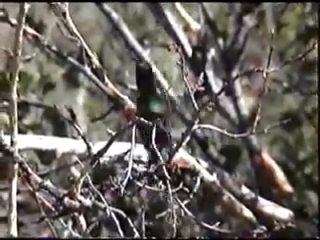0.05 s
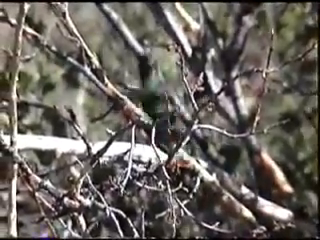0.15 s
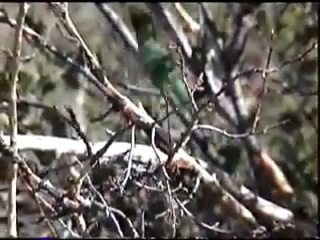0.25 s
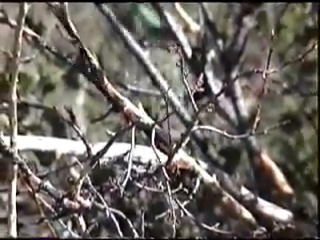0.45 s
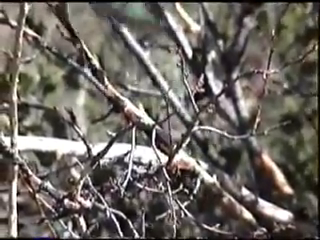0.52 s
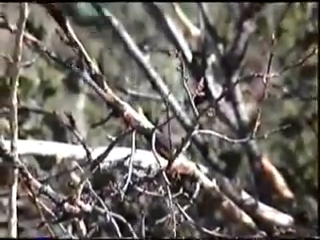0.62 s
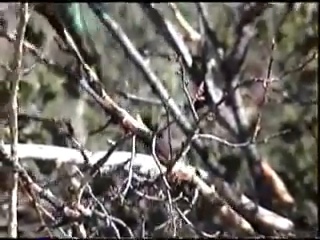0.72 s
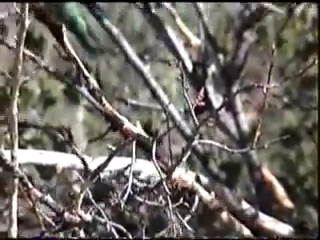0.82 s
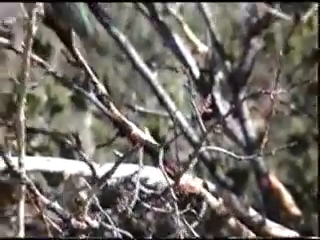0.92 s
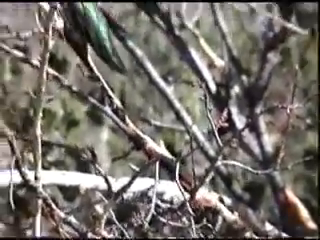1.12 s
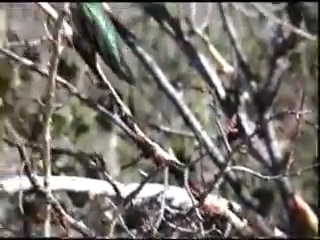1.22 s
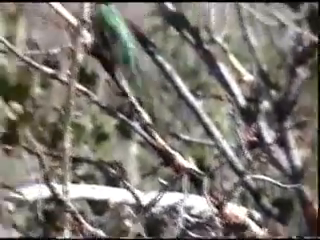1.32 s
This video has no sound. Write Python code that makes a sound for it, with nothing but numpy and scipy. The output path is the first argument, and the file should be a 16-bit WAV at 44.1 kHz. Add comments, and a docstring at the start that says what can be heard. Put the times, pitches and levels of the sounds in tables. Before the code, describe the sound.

A hummingbird takes off close to the microphone, its wings making a rapid, buzzy, whistling trill. The trill swells quickly, then fades as the bird moves away, over faint steady outdoor hiss.

```python
"""Hummingbird taking off

A hummingbird lifts off a nearby twig and hovers away. On each downstroke the slotted tip feathers of
both wings whistle, slightly out of tune, with a puff of air; the flip before it whistles more faintly.
Ground and shrubs scatter the trill. Behind it: far birds, a soft rush, outdoor hiss, a camera motor."""
import sys
import numpy as np
from scipy import signal
from scipy.fft import rfft, irfft
from scipy.io import wavfile

SR = 44100
rng = np.random.default_rng(int(sys.argv[2]) if len(sys.argv) > 2 else 0)


def unload_wav(signal):
    """Save mono or channel-first audio to the path in sys.argv[1] as 16-bit WAV at rate SR, clipped to [-1, 1]."""
    wavfile.write(
        sys.argv[1],
        SR,
        np.round(np.clip(np.atleast_2d(signal).T, -1, 1) * 32767).astype(np.int16),
    )


N = 59535
TIME_S = np.arange(N) / SR
TAKEOFF_S = .13

# flight path as heard (time [s], level [dB], feather pitch [Hz])
FLIGHT = [(.139, -47.5, 1950), (.163, -31.5, 1965), (.185, -38.5, 1980), (.206, -26.5, 1983),
          (.272, -17, 1986), (.415, -16, 1970), (.438, -19, 1954), (.463, -17.5, 1953), (.61, -21, 1967),
          (.683, -26, 1965), (.71, -24, 1907), (.812, -27, 1952), (.835, -31, 1910), (.882, -30, 1939),
          (1.006, -33.5, 1953), (1.056, -30, 1959), (1.08, -38.5, 1900), (1.3, -38, 1886)]


def feather_whistle(hz, flutter, sag_per_s=2.69, flutter_depth=.014, swell_s=.0037, release_s=.0026):
    """One sweep of a fluttering tip feather: a short swelling tone that sags in pitch."""
    # feather partials (pitch multiple, level [dB])
    partials = [(1, -22.5), (2, -63), (3, -1.5), (4, -42), (5, -20.5), (6, -44)]
    t = (np.arange(len(flutter)) - len(flutter) // 2) / SR
    turns = np.cumsum(hz * (1 - sag_per_s * t + flutter_depth * flutter)) / SR + rng.random()
    tone = sum(amp(db) * np.sin(2 * np.pi * k * turns) for k, db in partials)
    return tone * np.exp(-abs(t / np.where(t < 0, swell_s, release_s)) ** 4.5)


def wing_trill(size=1024, pitch_scatter=.0043, wing_detune=.0259, scatter_db=.94, wing_lag_s=.0015):
    """Both wings whistle as they flip over, then louder on the way down; a ground bounce follows."""
    # flip at the top of the stroke (time [s], level re downstroke [dB])
    flip_level = [(.25, -26), (.42, -25.5), (.7, -10.5), (.88, -2), (1.05, -4.5), (1.3, -1.5)]
    out, flutter = np.zeros(N), drift(620)
    for s in downstrokes():
        db, hz = curve(FLIGHT, s) + 2, curve(FLIGHT, s, column=2)
        # (delay [s], level [dB], pitch ratio), also for the wings below
        stroke = (0, 0, 1)
        bounce = (.0055, -11.5, 1)
        flip = (-.0065, curve(flip_level, s), 1.02)
        for delay_s, part_db, pitch in (stroke, bounce, flip):
            force, tune, lag = rng.standard_normal(3)
            loud_wing = (0, 0, 1 + pitch_scatter * tune)
            soft_wing = (wing_lag_s * lag, -5.5, 1 + wing_detune * rng.choice([-1, 1]))
            for lag_s, wing_db, wing_pitch in (loud_wing, soft_wing):
                tone = feather_whistle(hz * pitch * wing_pitch, flutter[rng.integers(N - size):][:size])
                gain = amp(db + part_db + wing_db + scatter_db * force)
                add(out, s + delay_s + lag_s - size / 2 / SR, gain * tone)
    return out


def beat_turns():
    """Wingbeats completed, per sample."""
    # wingbeat (time [s], rate [Hz])
    wingbeat = [(0.14, 43.1), (0.22, 46.74), (0.37, 40.73), (0.65, 41.14), (0.77, 38.31), (0.87, 43.05),
                (0.96, 39.37), (1.17, 41.28), (1.27, 37.54)]
    return np.cumsum(curve(wingbeat, TIME_S)) / SR


def downstrokes():
    """Times [s] of fastest downward sweep."""
    times = np.flatnonzero(np.diff(np.floor(beat_turns()))) / SR
    return times[times > TAKEOFF_S]


def wing_air(puff_s=.0042, puff_db=-16.5, lift_db=7.5, lift_s=.1):
    """A puff of turbulence per downstroke over the wings' low hum; the first strokes tear more air."""
    # torn air (frequency [Hz], density [dB])
    puff_spectrum = [(30, -2.5), (170, 2), (400, -3.5), (900, -4.5), (1500, -2), (1800, 12), (2150, 11.5),
                     (2700, -7.5), (4200, -6), (5900, -5.5), (7500, -3.5), (9000, -7), (12000, -3)]
    # hum (wingbeat multiple, level [dB])
    hum_partials = [(1, -42.5), (2, -49), (3, -44.5), (4, -44.5), (5, -79), (6, -42.5)]
    t, turns = TIME_S, beat_turns()
    puffs = sum(amp(rng.standard_normal()) * np.exp(-((t - s) / puff_s) ** 2) for s in downstrokes())
    lift = np.exp(-np.maximum(t - TAKEOFF_S, 0) / lift_s)
    turbulence = amp(puff_db + lift_db * lift) * puffs * noise(puff_spectrum)
    hum = sum(amp(db) * np.sin(2 * np.pi * k * turns) for k, db in hum_partials) * (t > TAKEOFF_S)
    return amp(curve(FLIGHT, t)) * (turbulence + hum)


def downwash():
    """Soft low thumps of air from the closest strokes."""
    # gusts (time [s], half-width [s], level [dB])
    gusts = [(0.22, 0.0099, -52), (0.268, 0.014, -55), (.319, 0.0067, -44), (0.47, 0.013, -60)]
    # (frequency [Hz], density [dB])
    gust_spectrum = [(25, -11), (160, -3), (400, -2), (800, -4), (2000, -13), (5000, -24)]
    envelope = sum(amp(db) * np.exp(-((TIME_S - s) / width_s) ** 2) for s, width_s, db in gusts)
    return envelope * noise(gust_spectrum)


def shrub_scatter(bird, places=8, late_db=-6):
    """Reflections that change as the bird moves and gain on the direct sound as it leaves."""
    # ground and shrub scatter (time [s], level re direct [dB])
    scatter = [(.2, -19.5), (.33, -12), (.45, -16.5), (.7, -6), (.9, -3), (1.3, -12.5)]
    sent = bird * amp(curve(scatter, TIME_S))
    place = np.linspace(0, places - 1, N)
    crossfades = (np.cos(np.pi / 2 * np.clip(place - k, -1, 1)) for k in range(places))
    early = sum(echoes(sent * fade, t60_s=.04) for fade in crossfades)
    return early + amp(late_db) * echoes(sent, t60_s=.22)


def stereo(mid, side_phase_rad=1.0):
    """Places the bird nearly ahead, a little left in the midrange, widest as it passes closest."""
    # side-signal filter (frequency [Hz], gain [dB])
    width = [(150, -28), (600, -25), (2000, -8.5), (3500, -19), (5600, -56), (6100, -25.5), (10000, -31)]
    # side-signal envelope (time [s], gain [dB])
    spread = [(.2, -11), (.32, 5.5), (.42, -1), (.7, -6), (1.3, -23)]
    side = irfft(rfft(mid) * gain_at(width) * np.exp(1j * side_phase_rad), N)
    side *= amp(curve(spread, TIME_S))
    return np.array([mid + side, mid - side])


def far_birds(warble_hz=110, wet_db=3):
    """A rough falling call and a faint rising warble, with echoes."""
    # calls (start [s], length [s], first pitch [Hz], last pitch [Hz], warble depth [Hz], level [dB])
    calls = [(-.03, 0.0577, 2680, 2328, 30.4, -44.5), (-.02, 0.037, 3300, 2760, 270, -46),
             (1.031, .31, 3112, 3460, 145, -61.5)]
    out = np.zeros(N)
    for start_s, length_s, first_hz, last_hz, depth_hz, db in calls:
        t = np.arange(0, length_s, 1 / SR)
        glide_hz = first_hz + (last_hz - first_hz) * t / length_s
        hz = glide_hz + depth_hz * np.sin(2 * np.pi * warble_hz * t)
        envelope = amp(db) * np.sqrt(2 * abs(np.sin(np.pi * t / length_s)))
        add(out, start_s, envelope * np.sin(2 * np.pi * np.cumsum(hz) / SR))
    return np.array([out + amp(wet_db) * echoes(out, t60_s=.22) for _ in range(2)])


def soft_rush():
    """Noise around 2.3 kHz that swells and fades."""
    # (time [s], level [dB])
    rush_level = [(0, -56.5), (.15, -51), (.4, -55), (.8, -61), (1.35, -99)]
    # (frequency [Hz], density [dB])
    rush_spectrum = [(1200, -19.5), (1900, -3), (2300, -2.5), (2800, -8.5), (3600, -10), (6000, -22)]
    return amp(curve(rush_level, TIME_S)) * noise(rush_spectrum)


def outdoor_hiss(level_db=-49):
    """Near-steady hiss, alike in both channels."""
    # (frequency [Hz], density [dB])
    hiss_spectrum = [(20, -3), (130, 3.5), (350, -1.5), (550, 2.5), (800, 0), (1400, 2), (2100, -0.5),
                     (2650, -6.5), (3200, -5), (4100, -2.5), (6000, -2.5), (9000, -8.5), (12000, -8)]
    return amp(level_db + .5 * drift(14)) * noise(hiss_spectrum)


def camera_motor(waver_rad=.15, rumble_db=-44.5):
    """Wavering motor whine over a rumble that is opposite in the two channels."""
    # whine lines (frequency [Hz])
    whine_hz = [1080, 1140, 1319, 1358, 1439, 1559, 2161]
    # per line (level [dB], phase between channels [rad])
    whine_lines = [(-59.5, 2.63), (-62, 1.73), (-68, 0.91), (-63, 1), (-68, 0.71), (-64, 0.6), (-64, .5)]
    # (frequency [Hz], density [dB])
    rumble_spectrum = [(20, 0), (55, -0.5), (140, 2), (280, -3), (480, -10.5), (750, -12.5), (1100, -15.5),
                       (1800, -12.5), (2800, -24), (3800, -19), (4300, -52), (12000, -52)]
    whine, sides = np.zeros((2, N)), np.array([[1], [-1]])
    for hz, (db, offset_rad) in zip(whine_hz, whine_lines):
        phase = 2 * np.pi * (hz * TIME_S + rng.random()) + waver_rad * drift(8)
        whine += amp(db) * np.sqrt(2) * np.cos(phase + sides * offset_rad / 2)
    rumble = amp(rumble_db + 1.7 * drift(14)) * noise(rumble_spectrum)
    return whine + sides * rumble


def amp(db):
    """Decibels to gain."""
    return 10 ** (np.asarray(db) / 20)


def unit(x):
    """Scales to rms 1."""
    return x / np.sqrt(np.mean(x ** 2) + 1e-20)


def curve(table, s, column=1):
    """Table column interpolated at time s."""
    table = np.array(table)
    return np.interp(s, table[:, 0], table[:, column])


def gain_at(spectrum):
    """Gain of a spectrum table per FFT bin."""
    hz, db = np.transpose(spectrum)
    return amp(np.interp(np.log(np.fft.rfftfreq(N, 1 / SR) + 1), np.log(hz), db))


def noise(spectrum):
    """Shaped noise, rms 1."""
    return unit(irfft(rfft(rng.standard_normal(N)) * gain_at(spectrum), N))


def drift(cutoff_hz):
    """Smooth random wander, rms 1."""
    lowpass = np.exp(-(np.fft.rfftfreq(N, 1 / SR) / cutoff_hz) ** 2)
    return unit(irfft(rfft(rng.standard_normal(N)) * lowpass, N))


def add(mix, s, sound):
    """Mixes a sound in at time s."""
    start = round(s * SR)
    sound = sound[max(-start, 0):]
    part = mix[max(start, 0):][:len(sound)]
    part += sound[:len(part)]


def echoes(x, t60_s):
    """Many small decaying reflections, at the rms of x."""
    t = np.arange(SR // 3) / SR
    taps = rng.standard_normal(len(t)) * (rng.random(len(t)) < .2)
    decay = (t > .002) * amp(-60 * t / t60_s)
    return unit(signal.fftconvolve(x, taps * decay)[:N]) * np.std(x)


def scene():
    """The bird, its reflections and the background."""
    bird = wing_trill() + wing_air()
    rush = soft_rush()
    near = stereo(bird + shrub_scatter(bird) + downwash())
    return near + rush + far_birds() + camera_motor() + outdoor_hiss()


def record(dry):
    """Low-pass at 12.1 kHz."""
    lowpass = signal.firwin(255, 12100, window=("kaiser", 8), fs=SR)
    return signal.oaconvolve(dry, lowpass[None], "same")


dry = scene()
out = record(dry)
unload_wav(out)
```